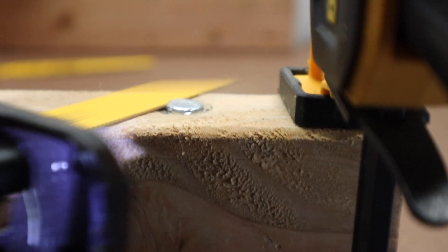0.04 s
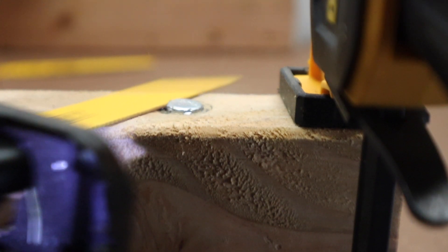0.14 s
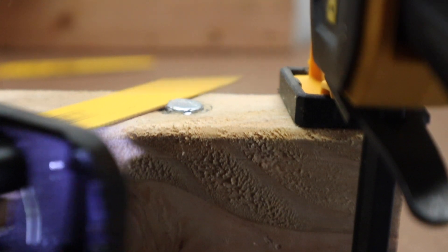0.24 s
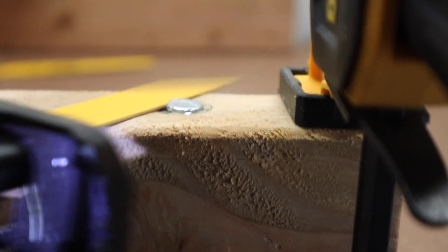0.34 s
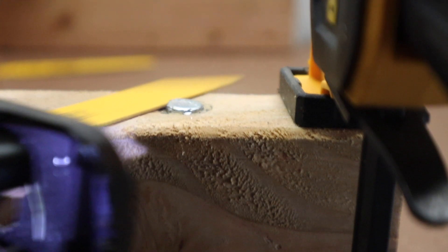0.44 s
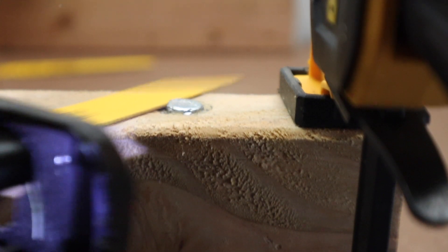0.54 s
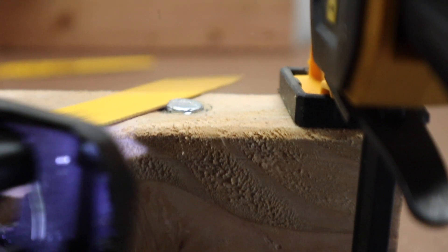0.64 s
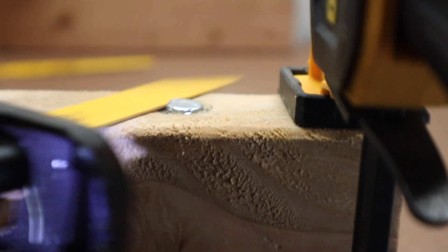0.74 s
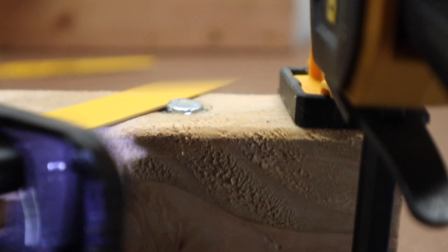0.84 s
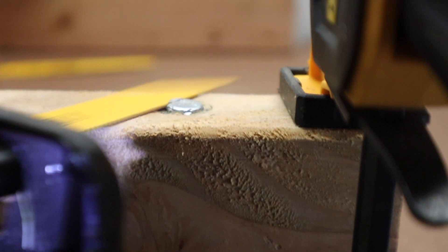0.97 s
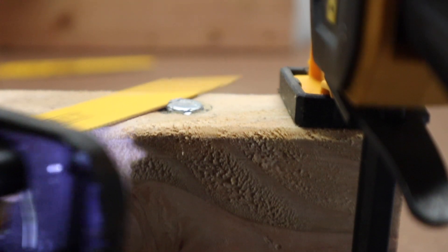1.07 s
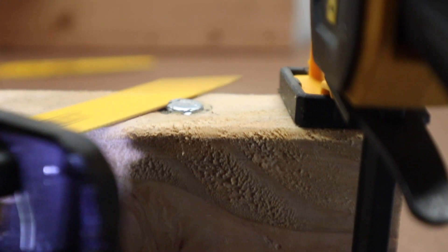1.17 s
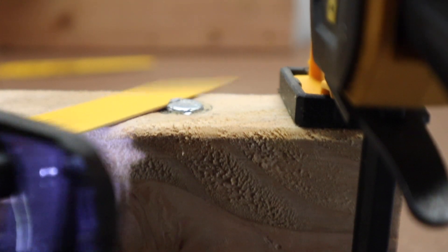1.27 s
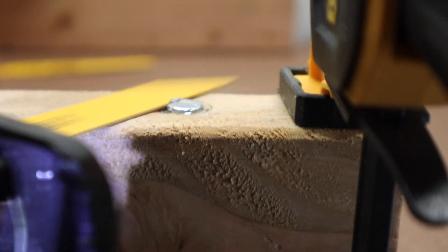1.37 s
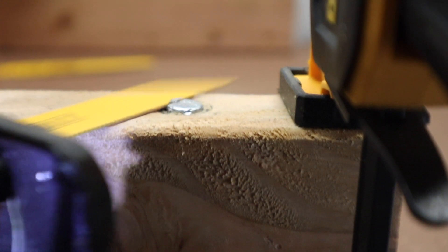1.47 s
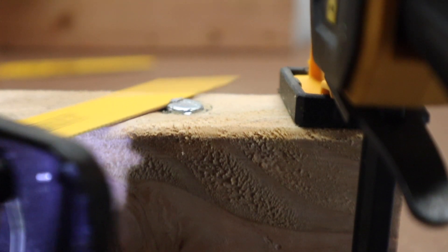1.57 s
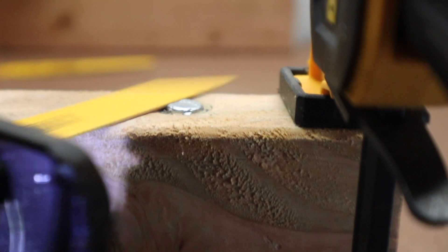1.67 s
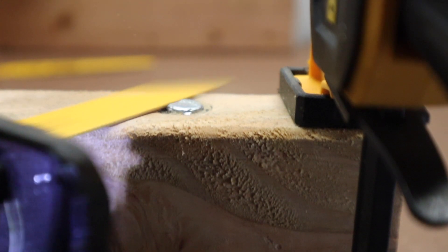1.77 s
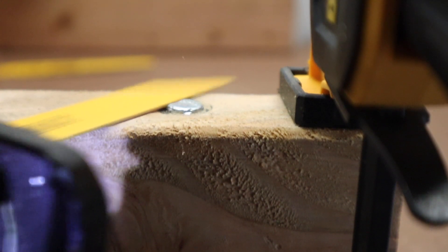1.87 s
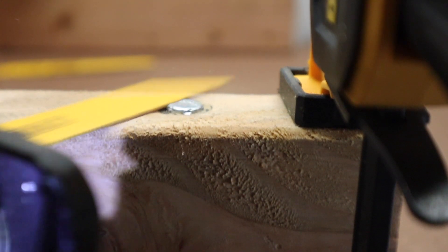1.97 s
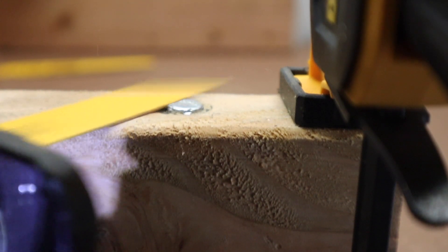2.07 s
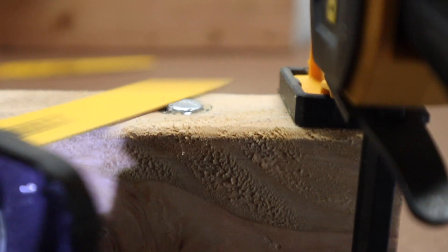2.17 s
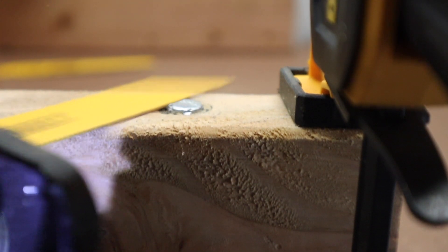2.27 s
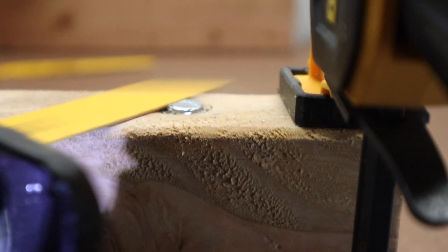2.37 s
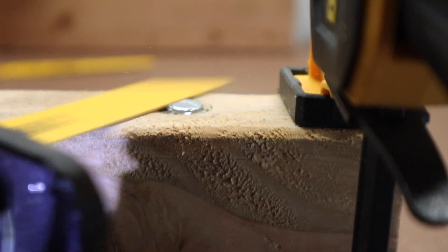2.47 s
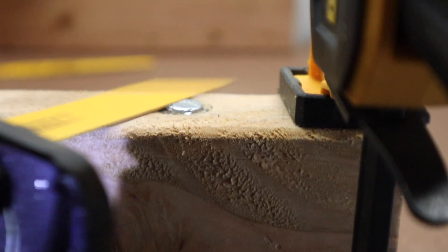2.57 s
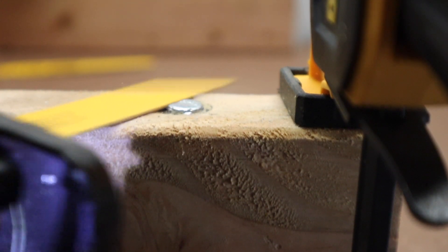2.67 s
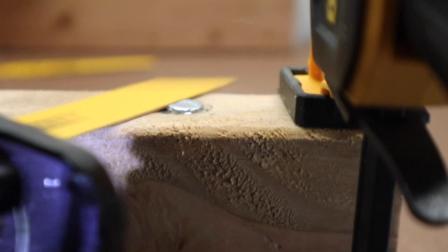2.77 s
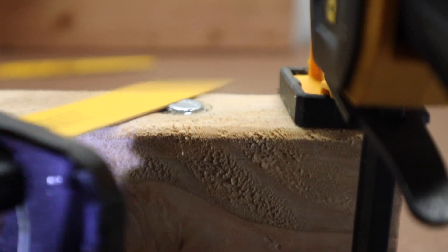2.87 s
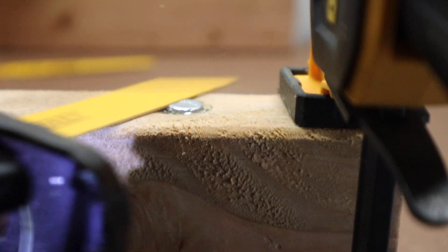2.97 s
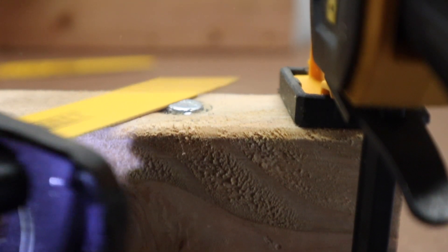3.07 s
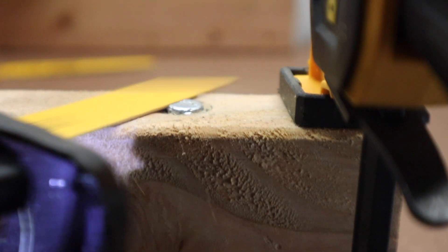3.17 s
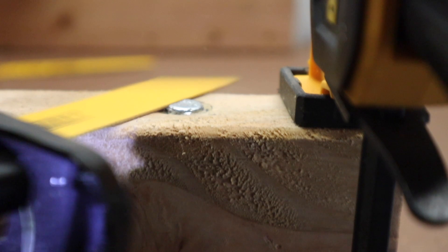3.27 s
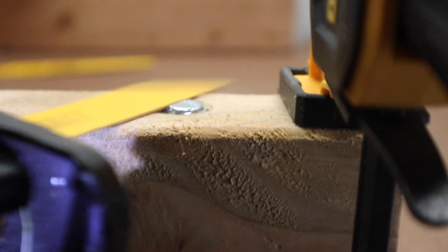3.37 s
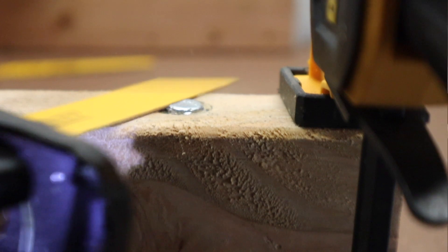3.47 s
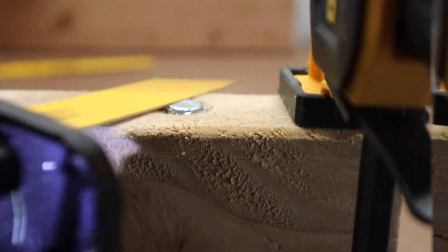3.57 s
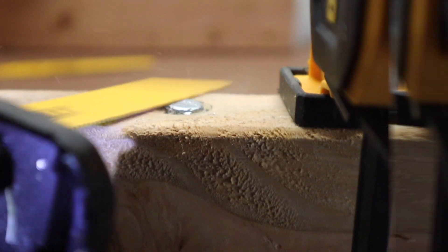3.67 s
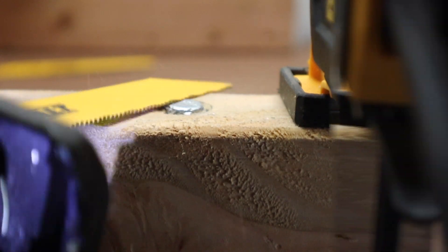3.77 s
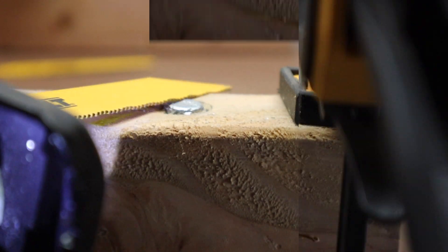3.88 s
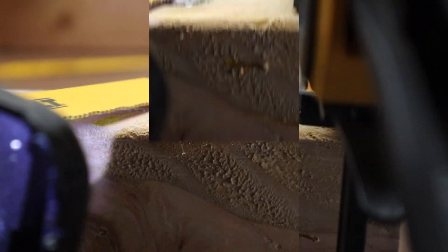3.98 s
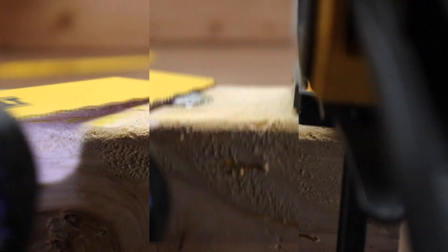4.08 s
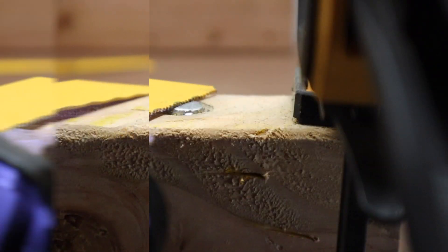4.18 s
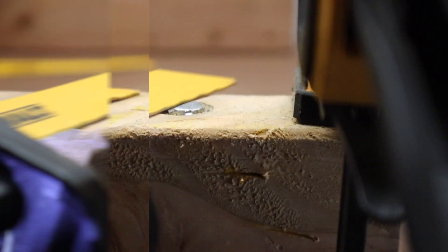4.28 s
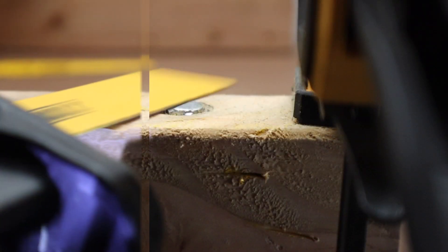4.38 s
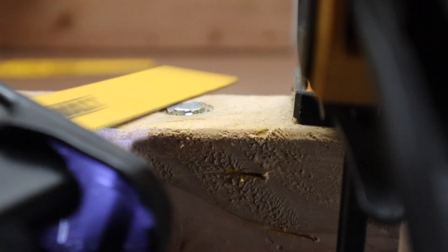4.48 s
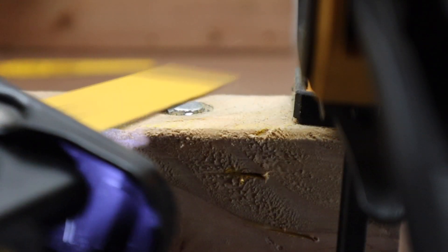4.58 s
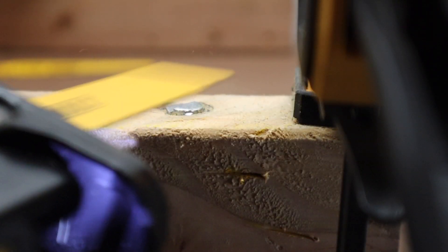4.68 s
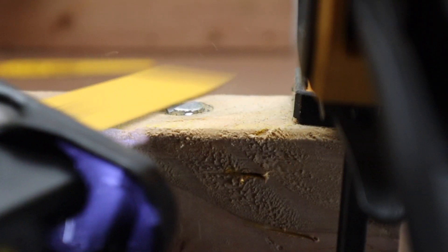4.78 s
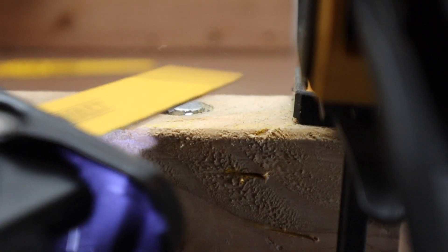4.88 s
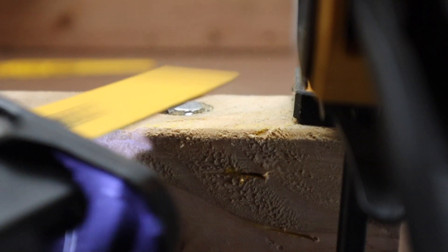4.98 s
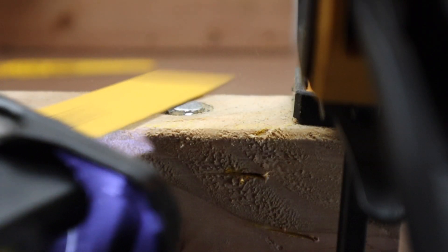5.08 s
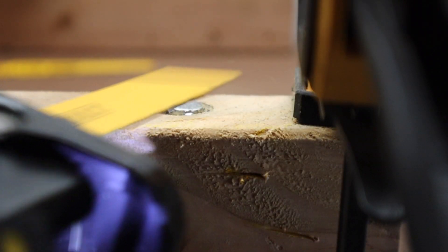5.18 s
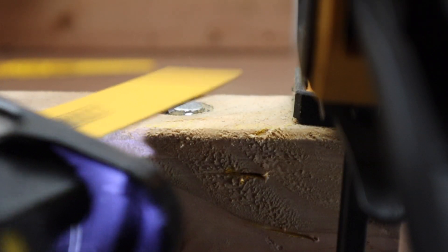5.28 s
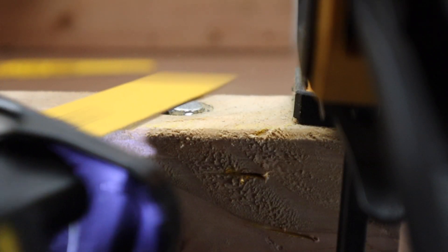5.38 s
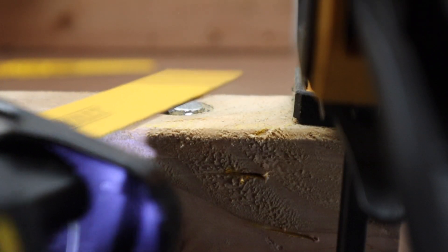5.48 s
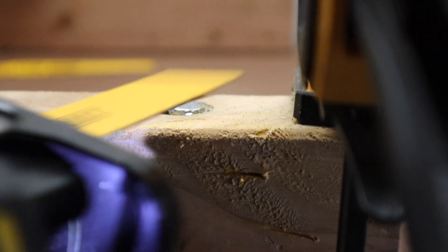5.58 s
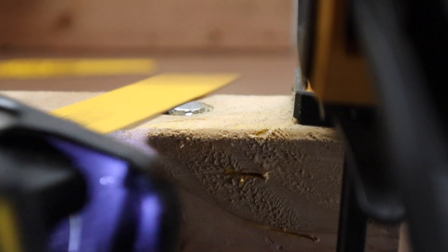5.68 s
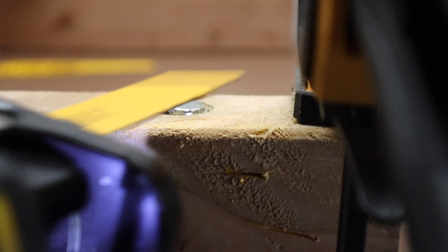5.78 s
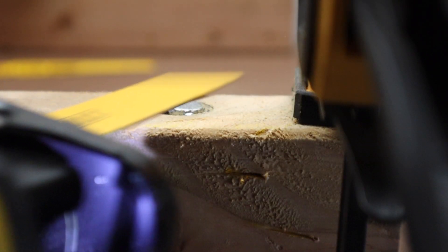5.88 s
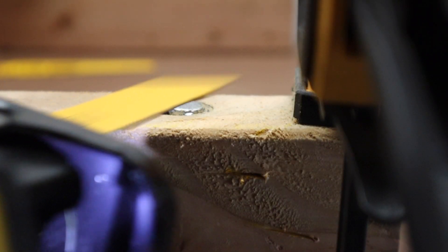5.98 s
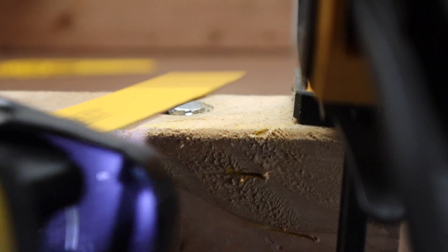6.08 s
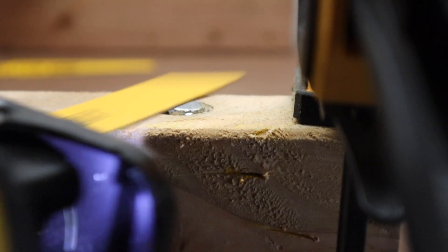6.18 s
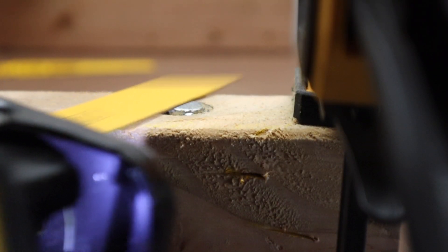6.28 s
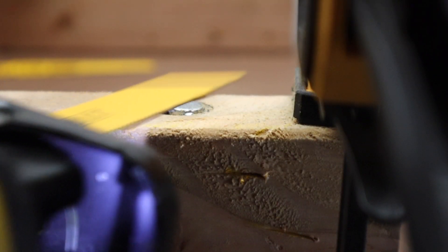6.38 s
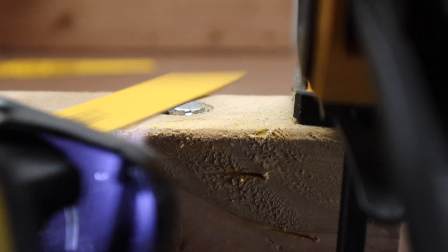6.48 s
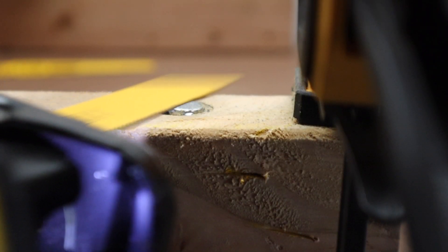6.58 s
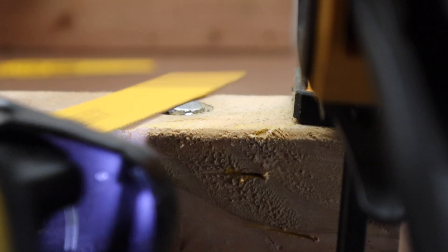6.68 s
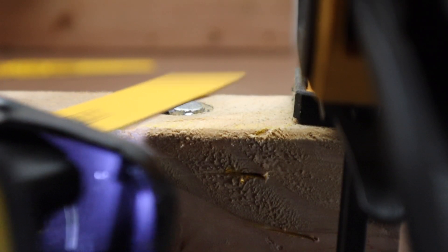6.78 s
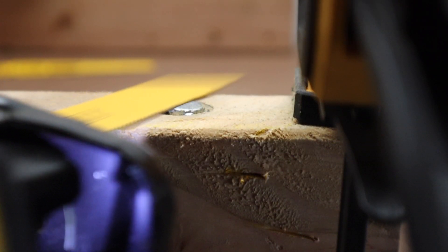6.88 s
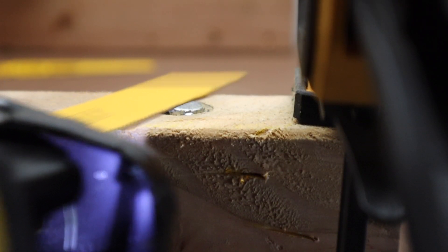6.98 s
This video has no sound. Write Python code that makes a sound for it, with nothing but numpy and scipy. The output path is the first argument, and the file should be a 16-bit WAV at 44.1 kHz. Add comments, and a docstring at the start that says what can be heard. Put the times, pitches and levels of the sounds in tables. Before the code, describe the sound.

A cordless reciprocating saw is heard close up in a small workshop with a short room tail. From 0 to 3.6 seconds it cuts a steel bolt in a wooden beam at full speed, about 46 strokes a second: a dense buzzing rattle, bright metallic rasp, thin gear and fan whine, and intermittent ringing blade chatter, swelling and fading. At 3.63 the trigger is released; the whine vanishes and the strokes brake to a stop by 3.8. A quiet rest holds only faint room noise and a tiny click near 4.0. From 4.27 small knocks and bright ticks begin, then heavy jolts between 4.45 and 4.7 as the motor climbs with a hoarse whistle and brief squawk. Full speed returns around 4.75, rougher and louder, with uneven low thumps and strong gear singing. The load eases gradually after 4.9, and the cutting continues steadily to the end at about 7 seconds.

```python
"""Reciprocating saw in a workshop

A cordless saw close to the microphone, in a small workshop, cuts a bolt in a wooden beam; it brakes, rests, starts again.
One crank angle drives the strokes: the slide knocks and the teeth rasp at fixed places in each stroke, the gears and
the motor fan sing at multiples of the stroke rate, and in the first cut the blade chatters in its kerf.
Single knocks and ticks mark the trigger and the restart; a short room tail and a quiet room lie around the saw."""
import sys
import numpy as np
from scipy import signal
from scipy.fft import rfft, irfft
from scipy.io import wavfile

SR = 44100
rng = np.random.default_rng(int(sys.argv[2]) if len(sys.argv) > 2 else 0)


def store_wav(level_fs):
    """Save 16-bit WAV to argv[1]."""
    pcm = np.round(np.clip(np.atleast_2d(level_fs), -1, 1) * 32767)
    wavfile.write(sys.argv[1], SR, pcm.T.astype(np.int16))


N = 310464
T = np.arange(N) / SR  # s

FULL_SPEED_HZ = 46.5  # strokes per second
GEAR_TEETH, PINION_TEETH, FAN_BLADES = 57, 7, 17
MOTOR_TURNS_PER_STROKE = GEAR_TEETH / PINION_TEETH


def undb(db):
    """Decibels to amplitude gain."""
    return 10 ** (np.asarray(db) / 20)


def curves(table):
    """The columns of a table, joined by straight lines in time."""
    s, *columns = np.transpose(table)
    return [np.interp(T, s, column) for column in columns]


def unit(x, where=slice(None)):
    """Scale to rms 1 over the given part."""
    return x / np.sqrt(np.mean(x[where] ** 2) + 1e-18)


def walk(rate):
    """Smooth chance with a spread near 1, changing `rate` times a second."""
    return 1.6 * np.interp(T * rate, np.arange(N), rng.standard_normal(N))


def colour(x, points, lifts=()):
    """Causal (minimum-phase) filter from a smooth spectrum with resonant lifts on top."""
    f = np.arange(2049) * SR / 4096
    hz, db = np.transpose(points)
    gain_db = np.interp(np.log(f + 1), np.log(hz), db)
    for centre, width, lift in lifts:
        gain_db = gain_db + lift / (1 + (2 * (f - centre) / width) ** 2)
    # folding the cepstrum forward makes the filter causal
    cepstrum = irfft(np.log(undb(gain_db)))
    cepstrum[1:len(f) - 1] *= 2
    cepstrum[len(f):] = 0
    impulse_response = irfft(np.exp(rfft(cepstrum)))
    return signal.fftconvolve(x, impulse_response)[:N]


def crank(rate):
    """Crank angle in turns, where the saw is up to speed, and a gain for sounds that grow with speed."""
    turns = np.cumsum(rate) / SR
    running = rate > .9 * FULL_SPEED_HZ
    fast = (rate / FULL_SPEED_HZ) ** 2
    return turns, running, fast


def run_up(rate, knee_hz, steepness):
    """Gain of a sound that grows with the stroke rate and levels off above a knee."""
    power = (rate / knee_hz) ** steepness
    return np.sqrt(power / (1 + power))


def lobes(turns, fast, table, base_db):
    """Strength of contact round the crank circle: bumps over a steady base, flatter at low speed."""
    power = undb(base_db) ** 2
    for centre, length, db in table:
        distance = (turns - centre + .5) % 1 - .5
        power = power + undb(db) ** 2 * np.exp(-.5 * (distance / length) ** 2)
    return unit(np.sqrt(power), fast > .8) ** np.minimum(fast, 1)


def contacts(turns, angles, sizes, jitter_s, scatter_db):
    """The same tiny impacts in every stroke, each a little early or late, harder or softer."""
    places = np.arange(int(turns[-1]) + 1)[:, None] + angles
    chance = rng.standard_normal(places.shape + (2,))
    at = np.interp(places, turns, np.arange(N)) + jitter_s * SR * chance[..., 0]
    size = sizes * undb(scatter_db * chance[..., 1])
    keep = (at > 0) & (at < N - 2) & (places < turns[-1])
    # share each impact between the two nearest samples
    whole, part = at[keep].astype(int), at[keep] % 1
    earlier = np.bincount(whole, size[keep] * (1 - part), N)
    later = np.bincount(whole + 1, size[keep] * part, N)
    return earlier + later


def pattern(turns, running, jitter_s, count=160):
    """Fine bright ticks of worn surfaces that come back at the same crank angles."""
    signs = rng.choice([-1, 1], size=count)
    ticks = contacts(turns, rng.random(size=count), signs, jitter_s, scatter_db=4)
    bright = signal.butter(4, 850, "high", fs=SR, output="sos")
    return unit(signal.sosfilt(bright, ticks), running)


def grit(spread_db):
    """Dense clicks of unequal size: chips breaking, loose parts rattling."""
    sizes = np.minimum(rng.standard_normal(N // 16 + 1), 2)
    sizes = np.repeat(sizes, 16)[:N]
    return unit(rng.standard_normal(N) * undb(spread_db * sizes))


# colour of the quiet room: pitch_hz, level_db
ROOM_COLOUR = [(20, -24.5), (60, -6), (300, -4), (450, -1.5), (600, -12), (2000, -11.5), (5000, -28),
               (15000, -40.5)]
ROOM_DB = -75.5


def quiet_room():
    """Steady noise of the empty workshop, shaped by the room's spectrum."""
    return undb(ROOM_DB) * unit(colour(rng.standard_normal(N), ROOM_COLOUR))


def workshop(x, wet_db, t60_low, t60_high):
    """A short wooden room: two bands of decaying noise, of which the treble dies first."""
    t = T[:SR // 2]
    low_pass = signal.butter(2, 3000, fs=SR, output="sos")
    high_pass = signal.butter(2, 3000, "high", fs=SR, output="sos")
    low = signal.sosfilt(low_pass, rng.standard_normal(len(t)))
    high = signal.sosfilt(high_pass, rng.standard_normal(len(t)))
    tail = low * np.exp(-np.log(1000) * t / t60_low)
    tail += 0.93 * high * np.exp(-np.log(1000) * t / t60_high)
    tail *= t > .004  # the tail follows the direct sound by 4 ms
    return x + undb(wet_db) * signal.fftconvolve(x, tail / np.linalg.norm(tail))[:N]


def single_blows(table, decay_s, spectrum):
    """Single blows: a short burst of rattle through the housing or the blade."""
    out = np.zeros(N)
    for s, db in table:
        envelope = np.exp(-np.abs(T - s) / decay_s) * (T >= s)
        burst = colour(rng.standard_normal(N) * envelope, spectrum)
        out += undb(db) * burst / np.abs(burst).max()
    return out


# the trigger clicks back: start_s, peak_db
TRIGGER = [(4.009, -45)]
# knocks as the motor takes up the slack and the blade catches: start_s, peak_db
JOLTS = [(4.269, -20.5), (4.273, -19.5), (4.374, -21), (4.465, -11), (4.523, -2.5), (4.591, -6), (4.62, -3),
         (4.67, -4), (4.694, -5)]
# colour of these knocks: pitch_hz, level_db
KNOCK_COLOUR = [(20, -40), (60, -16), (300, -4.5), (600, 1), (1100, 4.5), (1700, 1.5), (2400, 3),
                (3500, -4), (7500, -18), (10000, -17), (15000, -32)]


def trigger_and_jolts():
    """The trigger's click and the jolts of starting, as bursts coloured by the housing."""
    click = single_blows(TRIGGER, decay_s=0.008, spectrum=KNOCK_COLOUR)
    return click + single_blows(JOLTS, decay_s=0.0035, spectrum=KNOCK_COLOUR)


# the blade ticks against the bolt as it begins to move: start_s, peak_db
TICKS = [(4.289, -32), (4.375, -24), (4.451, -14)]
# colour of those ticks: pitch_hz, level_db
TICK_COLOUR = [(500, -30), (4000, -12), (7500, 2), (12000, -5), (15500, -6)]


def blade_ticks():
    """Very short bright bursts as the blade touches the bolt."""
    return single_blows(TICKS, decay_s=0.002, spectrum=TICK_COLOUR)


def drone(turns, running, orders):
    """The mass of the slide shakes saw and beam at the stroke rate and its multiples."""
    lines = np.zeros(N)
    for multiple, db in orders:
        phase = 2 * np.pi * (round(multiple) * turns + rng.random())
        lines += undb(db + 1.2 * walk(12)) * np.sin(phase)
    return unit(lines, running)


def thump():
    """Uneven low thumps of the beam: grit through a low resonance."""
    beam = [(12, -32), (28, -11), (45, 0.5), (85, -2.5), (125, -6.5), (170, -16.0), (400, -31)]  # Hz, dB
    return unit(colour(grit(7.1), beam))


def tone(turns, order, swing, flutter, dips=1):
    """A line at a multiple of the turning rate; the load swings its strength `dips` times a turn and chance shakes its phase."""
    load = 1 + swing * np.cos(2 * np.pi * dips * (turns - .22))
    line = np.sin(2 * np.pi * order * turns + flutter * walk(140))
    return unit(load * undb(0.66 * walk(25)) * line, np.gradient(turns) > 0)


# bouts of chatter in the first cut: start_s, end_s, lower_mode_level_db, upper_mode_level_db
CHATTER = [(.2, .4, -42, -20.5), (.47, .76, -25.5, -25.5), (.96, 1.16, -28.5, -26.5),
           (1.335, 1.62, -24.5, -25.5), (1.8, 2.0, -40, -25.5), (2.51, 2.57, -40, -23.5),
           (2.65, 2.74, -23.5, -34), (2.833, 3.08, -24, -26.5), (3.19, 3.54, -22.5, -33)]
# each bout swells and dies away over a faint steady ring
CHATTER_ATTACK_S, CHATTER_RELEASE_S, CHATTER_REST_DB = .05, .06, -41


def bouts(column):
    """Strength of one chatter mode: each bout swells, holds and dies away."""
    gain = undb(CHATTER_REST_DB)
    for start, end, *db in CHATTER:
        away = np.maximum(start - T, 0) / CHATTER_ATTACK_S
        away += np.maximum(T - end, 0) / CHATTER_RELEASE_S
        gain = np.maximum(gain, undb(db[column]) * np.exp(-away))
    return gain


# sideways modes of the blade: pitch_hz, ring_s, kick_angle_turns
CHATTER_MODES = [(1845, .0026, .9), (2406, .0033, .89)]


def chatter(turns, running):
    """Once a stroke the blade is kicked into each sideways mode, whose ring swells and dies."""
    out = np.zeros(N)
    t = T[:SR // 20]
    for mode, (hz, ring_s, angle) in enumerate(CHATTER_MODES):
        kicks = contacts(turns, np.array([angle]), 1, jitter_s=1.3e-5, scatter_db=2.5)
        ring = t * np.exp(-t / ring_s) * np.sin(2 * np.pi * hz * t)
        out += bouts(mode) * unit(signal.fftconvolve(kicks, ring)[:N], running)
    return out


def slide(turns, running, fast, knocks, body, base_db, repeat_db, jitter_s, spread_db):
    """Play in the slide and shoe: a rattle that partly repeats each stroke and rings the gearcase and beam."""
    rattle = undb(repeat_db) * pattern(turns, running, jitter_s) + grit(spread_db)
    return unit(colour(rattle * lobes(turns, fast, knocks, base_db), body), running)


# colour of the teeth on steel: pitch_hz, level_db
RASP = [(1800, -19), (3200, 1), (3800, -1.5), (4900, -0.5), (5700, -1), (6200, -0.5), (7000, 0.5),
        (8400, -3), (9300, -7.5), (11000, -11.5), (12800, -14.5), (14300, -16.5), (15600, -24)]
# resonances of the blade: pitch_hz, width_hz, lift_held_lightly_db, lift_pressed_home_db
BLADE = [(3740, 130, 4, 0), (4270, 130, 5.5, 3.5), (4885, 280, 6.5, 4.5), (8190, 370, 6, 6),
         (11720, 500, 6.5, 8), (12650, 220, 7, 2), (13480, 250, 9.5, 2), (14250, 300, 7.5, 7)]


def teeth(turns, running, fast, bites, cut, base_db, repeat_db, spread_db):
    """Teeth scrape the bolt with a wavering strength and ring the blade."""
    scrape = grit(spread_db) + undb(repeat_db) * pattern(turns, running, jitter_s=1.4e-5)
    scrape *= lobes(turns, fast, bites, base_db) * undb(0.45 * walk(90))
    blade = [(hz, width, lift[cut]) for hz, width, *lift in BLADE]
    return unit(colour(scrape, RASP, blade), running)


# crank speed in the first cut, before braking: time_s, stroke_rate_hz
SPEED_1 = [(0, 46.32), (.35, 46.09), (1.5, 45.96), (2.35, 46.68), (2.9, 46.06), (3.5, 45.93), (3.63, 46.01)]
# how hard the hand presses: time_s, press_db
PRESS = [(0, -.6), (.55, .5), (1.45, 0), (1.8, -1.6), (2.3, -1.4), (2.75, 1.1), (3.25, 0), (3.5, 1),
         (3.63, -0.6)]
# where the slide knocks within a stroke: crank_angle_turns, length_turns, level_db
KNOCKS_1 = [(.07, 0.11, -2.5), (.39, 0.025, -6), (.48, 0.12, -1.5), (.75, 0.024, 3.5), (.91, 0.1, 4)]
# where the teeth bite within a stroke: crank_angle_turns, length_turns, level_db
BITES_1 = [(.12, 0.13, -9.5), (.42, 0.11, -6.5), (.84, 0.082, 3)]
# drone of the swinging slide: stroke_rate_multiple, level_db
DRONE_1 = [(1, -0.5), (2, -5.5), (3, -12.5), (4, -11), (5, -19), (6, -9.5), (7, -13), (8, -14), (9, -2),
           (10, -7.5), (11, -2), (12, -10), (13, -15.5), (14, -9.5), (15, 2), (16, -4), (17, -5), (19, -8)]
# colour of gearcase, shoe and beam under the knocks: pitch_hz, level_db
BODY_1 = [(30, -10.5), (100, -16), (250, -19.5), (430, -10.5), (560, -3.5), (880, -3), (1050, -0.5),
          (1300, -3), (1600, 1), (2200, 2.5), (2600, 2), (2850, -2.5), (3080, 1.5), (3400, -17),
          (5000, -24)]
# levels before hand pressure and braking
KNOCK_1_DB, RASP_1_DB, SHAKE_1_DB = -19.5, -23.5, -31.5
# the trigger is let go and the brake grips ever harder
RELEASE_S, BRAKE_S, BRAKE_POWER = 3.63, .183, 3.5


def first_cut():
    """The saw is held lightly: the blade chatters and the fan whistles; then the brake stops it."""
    braking = np.clip((T - RELEASE_S) / BRAKE_S, 0, 1)
    rate = curves(SPEED_1)[0] * (1 - braking ** BRAKE_POWER)
    turns, running, fast = crank(rate)
    press_db, = curves(PRESS)
    # the rasp follows the hand most; these three fade as the brake grips
    knock = undb(KNOCK_1_DB + 0.46 * press_db - 6.7 * braking)
    rasp = undb(RASP_1_DB + 0.92 * press_db - 11 * braking)
    shake = undb(SHAKE_1_DB + .3 * press_db - 19 * braking)
    out = knock * slide(turns, running, fast, KNOCKS_1, BODY_1,
                        base_db=-6, repeat_db=-2, jitter_s=2.5e-5, spread_db=4)
    out += rasp * teeth(turns, running, fast, BITES_1, cut=0, base_db=-1.5, repeat_db=-4.0, spread_db=4.0)
    out += shake * drone(turns, running, DRONE_1)
    out += chatter(turns, running)
    gears = undb(-28.5) * tone(turns, GEAR_TEETH, swing=.9, flutter=.35, dips=2)
    fan = undb(-31.5) * tone(turns, MOTOR_TURNS_PER_STROKE * FAN_BLADES, swing=0.35, flutter=0.15)
    # gears and motor stop singing soon after the trigger is let go
    out += (gears + fan) * np.interp(T, [3.64, 3.69], [1, 0])
    return out * np.interp(T, [3.785, 3.805], [1, 0])


# crank speed in the second cut: time_s, stroke_rate_hz
SPEED_2 = [(4.27, 0), (4.46, 16.1), (4.6, 35.63), (4.72, 45.7), (4.82, 47.08), (5.1, 46.637),
           (7.04, 46.716)]
# where the slide knocks within a stroke: crank_angle_turns, length_turns, level_db
KNOCKS_2 = [(.02, 0.054, -5.5), (.15, 0.014, -19), (.37, 0.049, -6.5), (.48, 0.027, -7), (.63, .025, -13),
            (.88, 0.028, 1.5)]
# where the teeth bite within a stroke: crank_angle_turns, length_turns, level_db
BITES_2 = [(.12, 0.076, -10), (.38, 0.014, 9.5), (.49, .05, 2), (.88, 0.077, 7)]
# drone of the swinging slide: stroke_rate_multiple, level_db
DRONE_2 = [(1, 3.5), (2, -2.5), (4, -22), (6, -17), (7, -3), (10, -6.5), (11, -8), (12, -6), (13, -0.5),
           (15, -2), (16, -6)]
# colour of gearcase, shoe and beam under the knocks: pitch_hz, level_db
BODY_2 = [(25, -34), (100, -19), (250, -13.5), (400, -11), (530, -2), (850, -3), (1100, 1), (1430, -3.5),
          (1650, 2.5), (1950, 0), (2250, 7), (2500, -3), (3100, 0), (3500, -8.5), (5000, -25.5)]
# gearcase resonances, which growl as the rising gear note crosses them: pitch_hz, width_hz, lift_db
GEARCASE = [(1045, 200, 13.5), (2200, 210, 3.5)]
# levels before speed and load
KNOCK_2_DB, RASP_2_DB, THUMP_DB, MESH_DB = -19, -22.5, -38, -24.5
# the teeth dig in until this time, then the load eases with this time constant
DIG_UNTIL_S, EASE_S = 4.93, 0.75
# what that digging adds to each sound
DIG_KNOCK_DB, DIG_RASP_DB, DIG_THUMP_DB, DIG_MESH_DB, DIG_FAN_DB = 3, 1.16, 8.5, 2.5, 1.5


def second_cut():
    """The shoe is pressed home: the gears sing under load and the beam thumps unevenly."""
    rate, = curves(SPEED_2)
    turns, running, fast = crank(rate)
    motor = turns * MOTOR_TURNS_PER_STROKE
    dig = np.exp(-np.maximum(T - DIG_UNTIL_S, 0) / EASE_S)
    # these grow with speed and are louder while the teeth dig in
    knock = undb(KNOCK_2_DB + DIG_KNOCK_DB * dig) * run_up(rate, knee_hz=22.3, steepness=2.93)
    rasp = undb(RASP_2_DB + DIG_RASP_DB * dig) * run_up(rate, knee_hz=27, steepness=3.6)
    shake = undb(THUMP_DB + DIG_THUMP_DB * dig + 1.2 * walk(9)) * fast ** 1.7
    gear_hz = GEAR_TEETH * rate
    case_db = sum(lift / (1 + (2 * (gear_hz - hz) / width) ** 2) for hz, width, lift in GEARCASE)
    mesh = undb(MESH_DB + DIG_MESH_DB * dig + case_db) * run_up(rate, knee_hz=28.2, steepness=4.7)

    out = knock * slide(turns, running, fast, KNOCKS_2, BODY_2,
                        base_db=-4.5, repeat_db=-5.5, jitter_s=4e-5, spread_db=5.5)
    out += rasp * teeth(turns, running, fast, BITES_2, cut=1, base_db=5, repeat_db=-5.5, spread_db=4.0)
    out += shake * thump()
    out += undb(-34.5) * fast * drone(turns, running, DRONE_2)
    # the gear teeth are loaded twice a stroke, and clatter in their play until the speed settles
    backlash = np.clip(1 - fast ** 4, 0, 1)
    out += mesh * tone(turns, GEAR_TEETH, swing=1.04, flutter=0.35 + 1.2 * backlash, dips=2)
    # the loaded gear train rings at a few more multiples of the stroke rate
    ringing = undb(-30) * tone(turns, order=65, swing=0.56, flutter=0.42, dips=2)
    ringing += undb(-35) * tone(turns, order=105, swing=1.0, flutter=0.27)
    ringing += undb(-38.0) * tone(turns, order=107, swing=.7, flutter=0.25)
    hum = undb(-34.5) * tone(motor, order=4, swing=0.45, flutter=0.29)
    fan = tone(turns, MOTOR_TURNS_PER_STROKE * FAN_BLADES, swing=.8, flutter=0.29, dips=2.2)
    fan *= undb(-35.5 + DIG_FAN_DB * dig)
    out += fast * (ringing + hum + fan)
    # a hoarse whistle climbs while the motor gathers speed
    whistle = tone(motor, order=62, swing=.3, flutter=1.5) * walk(500)
    out += undb(-38) * whistle * np.interp(T, [4.32, 4.42, 4.5], [0, 1, 0])
    # the rising fan note squawks as it sweeps through a resonance of the housing
    squawk = np.sin(2 * np.pi * FAN_BLADES * motor)
    out += undb(-19) * squawk * np.interp(T, [4.515, 4.53, 4.545], [0, 1, 0])
    return out * np.interp(T, [4.268, 4.28], [0, 1])


def scene():
    """Two cuts close by with a short rest between them, in the room."""
    saw = first_cut() + second_cut() + trigger_and_jolts() + blade_ticks()
    in_room = workshop(saw, wet_db=-14.5, t60_low=0.31, t60_high=0.25)
    return (in_room + quiet_room())[None]


def record(dry):
    """The microphone's recorder clips at full scale and cuts the top."""
    top_cut = signal.ellip(12, .1, 85, 15650, fs=SR, output="sos")  # edge at 15650 Hz
    return signal.sosfilt(top_cut, np.clip(dry, -1, 1))


dry = scene()
out = record(dry)
store_wav(out)
```